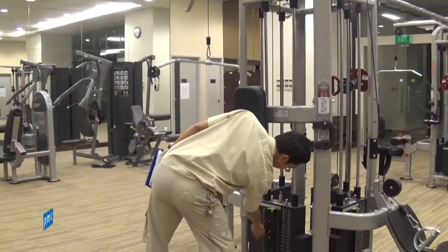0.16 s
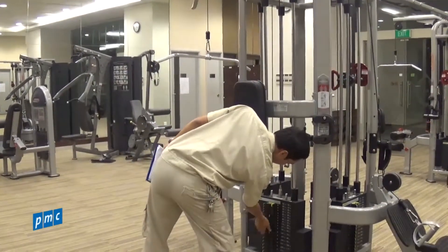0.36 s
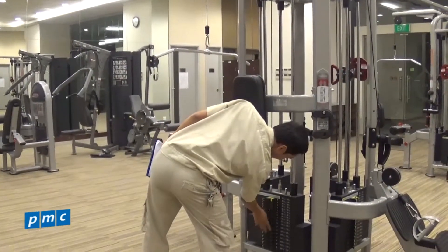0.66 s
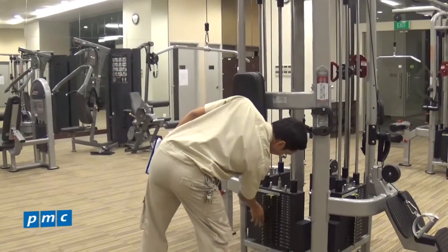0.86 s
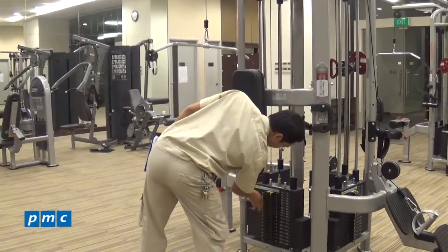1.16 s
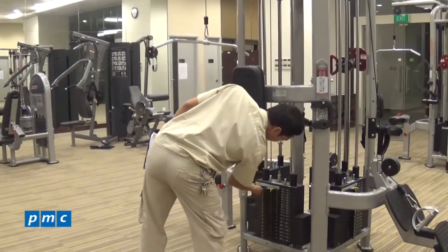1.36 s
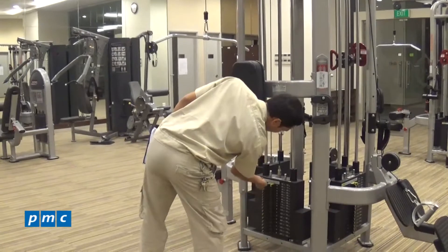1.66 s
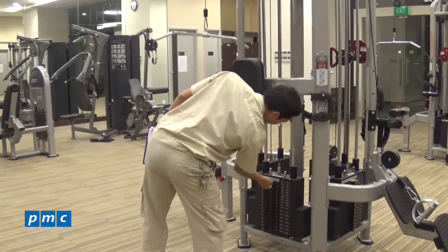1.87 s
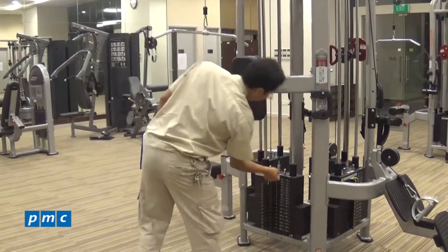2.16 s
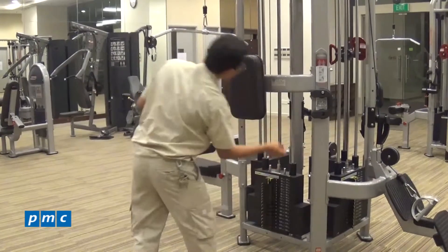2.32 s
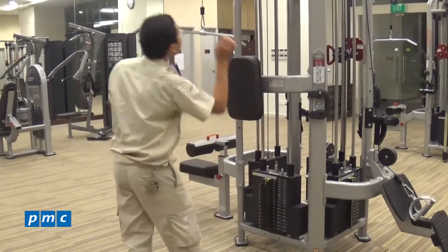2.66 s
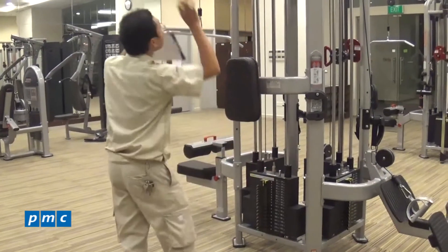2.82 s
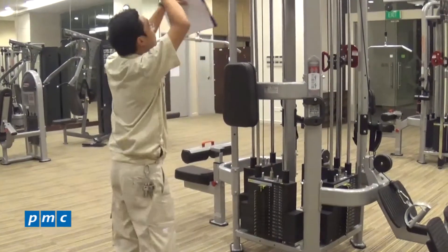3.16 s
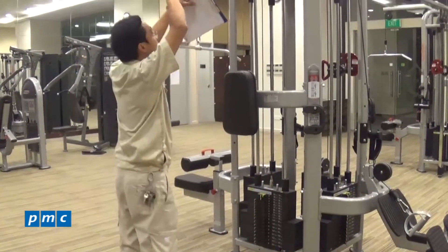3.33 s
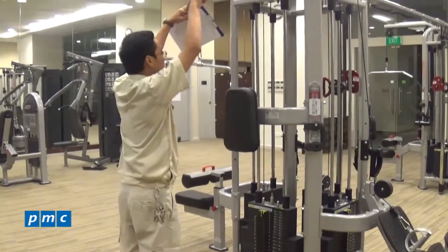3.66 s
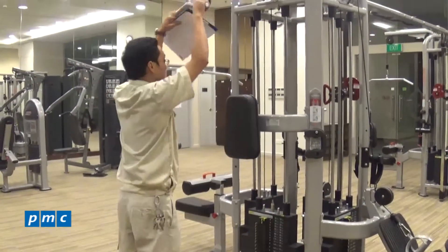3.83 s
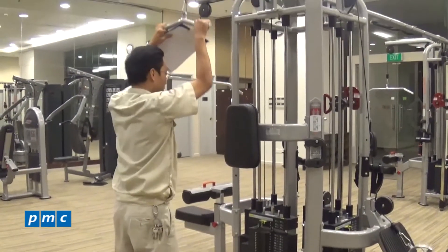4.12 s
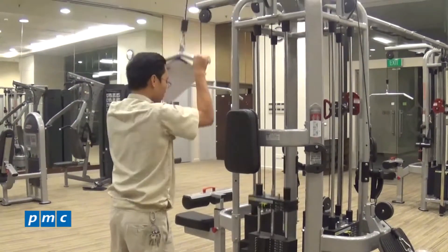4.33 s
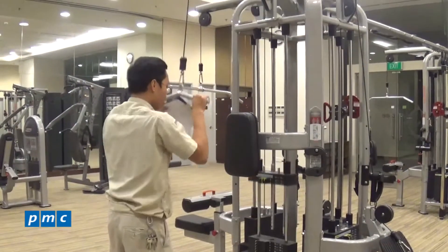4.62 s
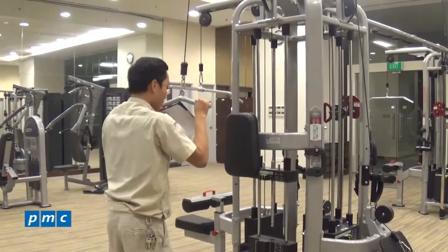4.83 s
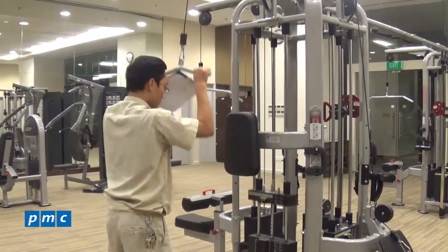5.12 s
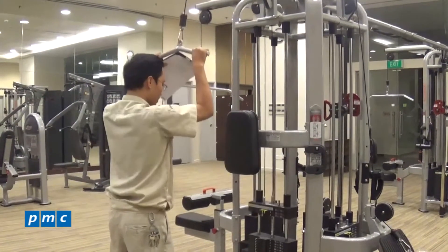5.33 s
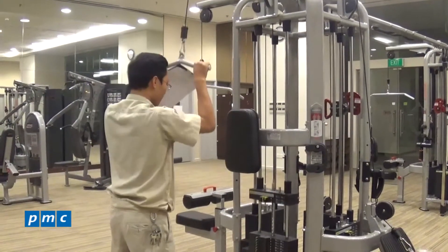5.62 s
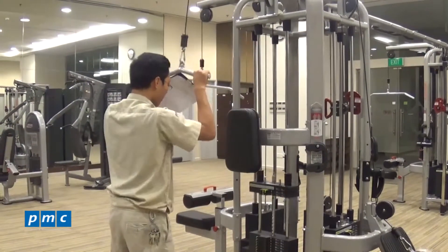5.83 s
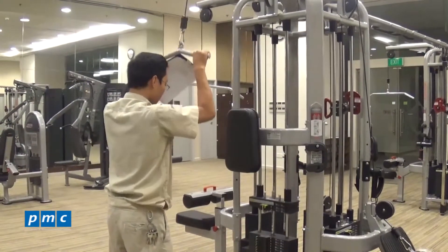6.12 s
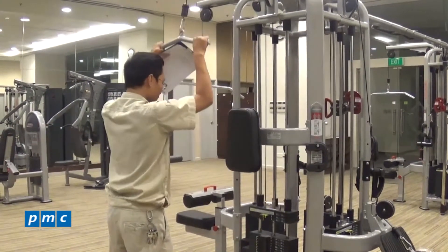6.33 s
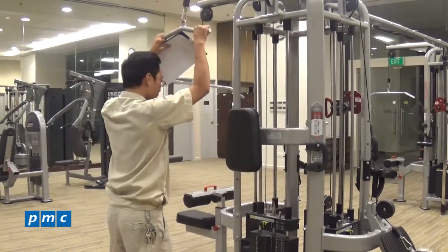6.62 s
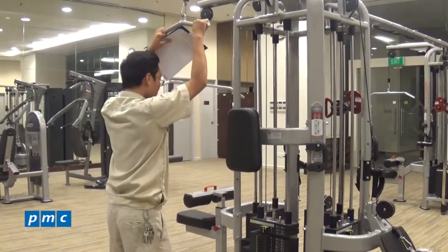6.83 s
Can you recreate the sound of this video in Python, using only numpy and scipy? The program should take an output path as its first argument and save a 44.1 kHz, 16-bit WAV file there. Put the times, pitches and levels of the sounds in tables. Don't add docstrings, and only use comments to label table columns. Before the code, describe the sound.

Five hard metallic clanks from stacked weight plates ring in a bright gym hall, then small camera clicks, a short steel-bar jingle and soft ventilation hiss.

```python
import sys
import numpy as np
from scipy import signal
from scipy.fft import rfft, irfft
from scipy.io import wavfile
from scipy.ndimage import uniform_filter1d

SR = 44100
rng = np.random.default_rng(int(sys.argv[2]) if len(sys.argv) > 2 else 0)


def natural_amplitude(level_db):
    exponent = np.asarray(level_db, float) / 20
    return 10 ** exponent


def master(y):
    cut = np.clip(np.atleast_2d(y).T, -1, 1)
    pcm = np.round(cut * 32767)
    wavfile.write(sys.argv[1], SR, pcm.astype(np.int16))


N = 307785
T = np.arange(N) / SR

# (time [s], ring level [dB], ring frequency [Hz], edge re ring [dB])
PIN_BLOWS = [(.039, -27.5, 2170, -19), (.0511, -30, 2110, -21), (.0746, -32, 2020, -14),
             (.1207, -27, 4030, -2), (.1281, -27.5, 2150, -9), (.1379, -12, 2120, -7), (.15, -16, 2280, -9),
             (.1686, -18.5, 2300, -5), (.5169, -26, 1960, -7), (.5258, -13, 2090, -4),
             (.5377, -19, 2110, -6), (.5467, -14.5, 2090, -5), (.5573, -18, 2110, -8),
             (.798, -29.5, 2170, -4), (.8259, -26, 2300, -6), (.844, -14, 2170, -2), (.8544, -15, 2500, -8),
             (1.167, -34, 1960, 2), (1.1793, -13, 2450, -3.5), (1.2085, -13.5, 1900, -5),
             (1.226, -19, 1680, -2), (1.2359, -18, 1590, -13), (1.5962, -37, 2110, -6),
             (1.6088, -37, 1890, 3), (1.6999, -38, 3620, -2), (1.7416, -32, 4480, 3.5),
             (1.7562, -24, 4330, 13), (1.765, -19, 2000, 3), (1.7737, -17, 1530, -.4),
             (1.7854, -21.5, 4200, 3)]
# (time [s], ring level [dB], ring frequency [Hz], edge re ring [dB])
HOOK_BLOWS = [
    (3.8345, -50, 1450, -25),
    (3.8655, -44, 1400, 4),
    (3.8719, -43, 1500, -3),
    (3.8775, -28, 2390, 11.5),
    (3.882, -27, 4010, .3),
    (3.8925, -27, 4010, 6),
    (3.8995, -25, 1830, 0),
]
# (start [s], hardest blow [s])
CLANK_TIMES = [
    (0, .039),
    (.11, .1375),
    (.5, .5255),
    (.82, .8435),
    (1.16, 1.179),
    (1.73, 1.756),
    (3.82, 3.877),
]
# (tail in the hall [dB], gain lost to the limiter [dB])
CLANK_LEVELS = [
    (-41, 3.5),
    (-17.5, 7),
    (-23, 5),
    (-19, 5.5),
    (-25, -0.5),
    (-19, 5.5),
    (-32, 2.5),
]
# (frequency [Hz], density [dB per Hz])
CLANK_COLOURS = [
    [(300, -35.5), (1260, -13), (1700, -20), (2060, -8.5), (3060, -17), (4390, -12), (5020, -21.5),
     (11000, -24)],
    [(300, -48.5), (1110, -17.5), (1620, -28.5), (1800, 5), (2290, 3.5), (2600, -7.5), (9320, -14),
     (11000, -15)],
    [(200, -41), (880, -18.5), (1710, -11.5), (2270, -2), (2690, -11.5), (3640, -11.5), (6880, -11.5),
     (11000, -17)],
    [(300, -43), (1000, -14.5), (1270, -20.5), (1620, -18.5), (2290, 0), (3100, 1), (3550, -3.5),
     (11000, -11.5)],
    [(250, -28.5), (800, -15.5), (1710, -2), (3830, -9), (4760, -16.5), (5820, -8), (6880, -17.5),
     (10000, -13.5)],
    [(300, -33.5), (585, -23), (804, -12.5), (1500, -5.5), (2200, -3.5), (4840, -7.5), (9300, -1),
     (11000, -11)],
    [(200, -7.5), (450, -12.5), (1200, -2), (1890, -4.5), (2350, -7), (4760, -14.5), (6330, -2.5),
     (11000, -10.5)],
]
# (frequency [Hz], width [Hz], level [dB])
PLATE_MODES = [
    [(2070, 150, 0), (4430, 270, -14)],
    [(1980, 450, 0), (3140, 54, -6), (4460, 180, -12), (4880, 47, -11), (5620, 56, -14), (9040, 70, -17)],
    [(2310, 180, 0), (3200, 130, -5), (4180, 63, -8), (6690, 56, -11), (8430, 340, -15), (9040, 250, -15)],
    [(2280, 110, -4), (2650, 190, -3), (3170, 72, 0), (3960, 53, -10), (5360, 45, -9), (6380, 37, -12)],
    [(1710, 160, 0), (2290, 65, -1), (2770, 100, -4), (3270, 72, -5), (5650, 53, -10), (8860, 41, -16)],
    [(1480, 38, 0), (2150, 130, -2), (3090, 200, -3), (6210, 91, -7)],
    [(684, 54, 0)],
]
PLATE_MODES_DB = [-10, -9, -10, -7, -11, -13, -21]
BAR_MODES_HZ = [680, 1180, 1313, 1824, 1911, 2637, 2976, 3784, 4198, 6481, 7445, 8510, 9743, 9824]
BAR_MODES_DB = [-21, -14, -10, -13, -10, -19, -7, -8.5, -9, 2, -12, -14, -16, -10]
# (time [s], time until a hand damps it [s])
BAR_BLOWS = [
    (3.879, .035),
    (3.893, .02),
]
BAR_BLOWS_DB = [-19.5, -19.5]
# (frequency [Hz], T60 [s])
HALL_DECAY = [(200, 2.7), (800, 1.68), (2000, 1.223), (4000, 1.17), (7000, 0.77), (11000, 0.69)]
# (frequency [Hz], side minus mid [dB])
HALL_WIDTH = [(200, -15.5), (1000, -7.5), (4000, -7), (11000, -8)]
# (time [s], low ring [dB], low ring [Hz], high ring [dB], high ring [Hz])
BODY_CLICKS = [
    (2.5196, -55, 1120, -57, 7690),
    (2.7779, -35, 3750, -34, 5560),
    (3.0256, -37.5, 3700, -53, 9000),
    (3.2033, -32, 2820, -28, 9800),
    (3.4249, -62, 1060, -52, 10000),
    (6.3022, -54.5, 2900, -54, 4970),
    (6.5623, -51, 2520, -57, 6740),
]
# (time [s], level [dB], frequency [Hz], length [s])
BODY_KNOCKS = [
    (2.775, -45, 930, 0.0067),
    (3.204, -43.5, 1070, 0.009),
    (5.763, -53, 960, .006),
    (5.766, -51, 460, 0.0093),
]
# (start [s], level [dB], treble re low [dB], rise [s], hold [s])
CLOTH_RUB = [
    (2.702, -48.5, -1.5, .05, .065),
    (2.779, -49, 6, .002, .002),
]
# (time [s], level [dB], rise [s])
PULLEY_WHISPER = [
    (4.45, -59, .15),
    (5.06, -57, .4),
    (6.31, -69, .6),
]
# (time [s], level [dB])
FLOOR_LURCHES = [
    (3.894, -56),
    (4.01, -47.5),
    (4.252, -58),
    (4.42, -65),
]
# (frequency [Hz], density [dB per Hz])
HISS_COLOUR = [(12, -46), (20, -19), (48, -13), (75, -8), (103, -9), (153, -6), (194, -9), (463, -10),
               (850, -11), (1110, -14), (2200, -16), (2510, -16.5), (3350, -18.5), (10200, -22.5),
               (11000, -26), (14300, -65), (22000, -120)]
# (frequency [Hz], side minus mid [dB])
HISS_WIDTH = [(60, -18.5), (110, -17), (190, -5), (340, -3), (610, -1), (1100, 0), (1960, -0.5), (3510, -4),
              (6270, -6), (11200, -9.5)]
# (time [s], level [dB])
ROOM_TONE_LEVEL = [(0, -52), (2.6, -52), (3.6, -55.5), (5, -57), (7, -59)]
# (frequency [Hz], rms level [dB])
MAINS_HUM = [(100, -61.5), (200, -73.5), (300, -80.5)]

EDGE_HZ, EDGE_HZ_PER_DB, EDGE_TOP_HZ = 8530, 191.5, 9300
CONTACT_S, CONTACT_DB_PER_HALVING = .0034, 30
REBOUND_S, REBOUND_DB = .007, -13
CLANK_SPAN_S = .105
SKIRT_LOW_DB, SKIRT_HIGH_HZ, SKIRT_HIGH_DB = -19.5, 15440, -31.5
STACK_PAN_DB = -.5
BAR_LEFT_DB, BAR_T60_S, BAR_BEAT_DB = -35.5, 1.1, 3
BAR_WET_DB = -46
EARLIER_S, EARLIER_DB = .32, -28.5
CLICK_S = .0022
RUB_FADE_DB_S, RUB_TREBLE_FADE_DB_S = 300, 650
TICK_S, TICK_PERIOD_S, TICK_LENGTH_S = .0715, .04, .003
TICK_HZ, TICK_DB, TICK_WEAK_DB = 2650, -59.5, -8
THUD_RISE_S, THUD_FADE_DB_S, THUD_DEEP_DB, THUD_DEEP_S = .069, 99, -84.5, .56
PULLEY_FADE_DB_S = 32
LIMIT_DB, RELEASE_S, TOP_HZ = 0, .048, 11000


def stack():
    direct, sent = np.zeros(N), np.zeros(N)
    blows = PIN_BLOWS + HOOK_BLOWS
    for (s, db, hz, edge), late in zip(blows, rng.random(len(blows))):
        edge_db = db + edge
        edge_hz = min(EDGE_HZ + EDGE_HZ_PER_DB * edge, EDGE_TOP_HZ)
        length = CONTACT_S * 2 ** (-(max(db, edge_db) + 19) / CONTACT_DB_PER_HALVING)
        add(direct, s, clack(db, hz, edge_db, edge_hz, length, wide=.35))
        rebound = clack(db + REBOUND_DB, hz, edge_db + REBOUND_DB, edge_hz, 2 * length, wide=.35)
        add(direct, s + REBOUND_S * (.5 + late), rebound)
    clanks = zip(CLANK_TIMES, CLANK_LEVELS, CLANK_COLOURS, PLATE_MODES, PLATE_MODES_DB)
    for (start, _), (tail_db, _), spectrum, modes, modes_db in clanks:
        push = np.zeros(SR // 2)
        for s, ring_db, _, edge in blows:
            if start <= s < start + CLANK_SPAN_S:
                push[int((s - start) * SR)] = natural_amplitude(ring_db) * np.hypot(1, natural_amplitude(edge))
        add(sent, start, plates(push, spectrum, modes, modes_db) * natural_amplitude(tail_db))
    return direct, sent


def plates(push, spectrum, modes, modes_db):
    (low_hz, low_db), (_, high_db) = spectrum[0], spectrum[-1]
    below = (.6 * low_hz, low_db + SKIRT_LOW_DB)
    above = (SKIRT_HIGH_HZ, high_db + SKIRT_HIGH_DB)
    crash = colour(push, [below, *spectrum, above, (SR / 2, -120)])
    rings = sum(natural_amplitude(db) * band(push, hz, width + 50) / np.sqrt(width + 50) for hz, width, db in modes)
    return (unit(crash) + natural_amplitude(modes_db) * unit(rings)) / np.sqrt(len(push))


def clack(low_db, low_hz, high_db, high_hz, length, wide=.2, broad=.4):
    t = T[:1024]
    contact = np.exp(-(t / (1.1 * length)) ** 2) + .3 * np.exp(-t / (2 * length))
    chatter = rng.standard_normal((4, len(t))) * contact * np.minimum(t / .0003, 1)
    ring = patch(chatter[0], low_hz, wide * low_hz, .6 * low_hz)
    crack = patch(chatter[1], 3300, 2600, 2600)
    edge = patch(chatter[2], high_hz, 1500, 4000)
    sizzle = patch(chatter[3], 8000, 6000, 6000)
    return energy(ring + broad * crack, low_db) + energy(edge + .6 * sizzle, high_db)


def bar():
    held_ring, left_ring = np.zeros(N), np.zeros(N)
    t, start = T[:SR], BAR_BLOWS[0][0]
    phases = rng.random(len(BAR_MODES_HZ))
    modes = [natural_amplitude(db) * np.sin(2 * np.pi * (hz * t + phase))
             for hz, db, phase in zip(BAR_MODES_HZ, BAR_MODES_DB, phases)]
    swing = 0
    for (s, held), db in zip(BAR_BLOWS, BAR_BLOWS_DB):
        since = np.maximum(t - s + start, 0)
        blow = natural_amplitude(db) * np.exp(-(since / held) ** 2.5) * np.minimum(since / .002, 1)
        swing = np.hypot(swing, blow)
    add(held_ring, start, swing * sum(modes))
    swaying = 0
    for mode, hz in zip(modes, BAR_MODES_HZ):
        fade_db = 60 * t / BAR_T60_S * max(hz / 3000, 1) ** .45
        swaying = swaying + mode * natural_amplitude(BAR_BEAT_DB * walk(40, size=len(t)) - fade_db)
    add(left_ring, start, natural_amplitude(BAR_BLOWS_DB[-1] + BAR_LEFT_DB) * swaying * np.minimum(t / .03, 1))
    return held_ring, left_ring


def hall():
    t, out = T[:2 * SR], 0
    for hz in 125 * 2 ** np.arange(0, 6.8, 1 / 3):
        noise = rng.standard_normal((2, len(t)))
        mid, side = band(band(noise, hz, hz / 3), hz, hz / 3)
        side = side * natural_amplitude(by_hz(HALL_WIDTH, hz))
        decay = np.exp(-np.log(1000) * t / by_hz(HALL_DECAY, hz))
        out = out + np.array([mid + side, mid - side]) * decay
    lumps = natural_amplitude(3.8 * walk(250, size=len(t)) * np.exp(-t / .11))
    onset = np.clip((t - .003) / .01346, 0, 1)
    return out * lumps * onset / np.sqrt(np.mean(out[:, :SR // 10] ** 2))


def camera():
    out = np.zeros((2, N))
    for s, *click in BODY_CLICKS:
        add(out, s, clack(*click, CLICK_S, wide=.3, broad=.9))
    for s, db, hz, length in BODY_KNOCKS:
        add(out, s, band(clack(db, hz, db - 30, 6400, length), hz, hz))
    grain = rng.standard_normal((2, N)) * natural_amplitude(2.5 * walk(200))
    low, treble = patch(grain[0], 1950, 800, 1400), patch(grain[1], 9000, 4500, 5500)
    for s, db, treble_db, rise, hold in CLOTH_RUB:
        out += low * swell(s, db, rise, hold, RUB_FADE_DB_S)
        out += treble * swell(s, db + treble_db, rise, hold, RUB_TREBLE_FADE_DB_S)
    for k, s in enumerate(np.arange(TICK_S, N / SR, TICK_PERIOD_S)):
        db = TICK_DB + TICK_WEAK_DB * (k % 2) + .8 * rng.standard_normal()
        tick = clack(db, TICK_HZ, db - 30, 6000, TICK_LENGTH_S, wide=.3, broad=.2)
        add(out, s, tick * np.array([[1.3], [.7]]))
    return out


def pulleys():
    grain = rng.standard_normal((2, N)) * natural_amplitude(3.5 * walk(30))
    pulls = sum(swell(s, db - 3.5, rise, 0, PULLEY_FADE_DB_S) for s, db, rise in PULLEY_WHISPER)
    return patch(grain, 1000, 1400, 1400) * pulls


def floor():
    deep, low = rng.standard_normal((2, N))
    rumble = swell(FLOOR_LURCHES[0][0], THUD_DEEP_DB, THUD_RISE_S, THUD_DEEP_S, THUD_FADE_DB_S)
    lurches = sum(swell(s, db, THUD_RISE_S, 0, THUD_FADE_DB_S) for s, db in FLOOR_LURCHES)
    return patch(deep, 25, 25, 25) * rumble + unit(band(low, 55.3, 25)) * lurches


def room_tone():
    mid, side = (colour(noise, HISS_COLOUR) for noise in rng.standard_normal((2, N)))
    side = colour(side, HISS_WIDTH) / np.std(mid)
    air = (unit(mid) + side * np.array([[1], [-1]])) * natural_amplitude(.73 * walk(4.6))
    hum = 0
    for hz, db in MAINS_HUM:
        level = np.sqrt(2) * natural_amplitude(db + .5 * walk(8.9))
        hum = hum + level * np.sin(2 * np.pi * hz * T + .3 * walk(5.4))
    stirring = patch(rng.standard_normal((2, N)), 22, 20, 20) * natural_amplitude(-74)
    return (air + hum * natural_amplitude(56.5)) * natural_amplitude(along(ROOM_TONE_LEVEL, column=1)) + stirring


def ducking():
    lost_db = 0
    for (_, s), (_, db) in zip(CLANK_TIMES, CLANK_LEVELS):
        since = np.maximum(T - s, 0)
        lost_db = lost_db + db * (T > s) * np.exp(-(since / RELEASE_S) ** 1.8)
    return natural_amplitude(-uniform_filter1d(lost_db, size=133))


def along(table, column):
    rows = np.array(table, float)
    return np.interp(T, rows[:, 0], rows[:, column], left=-120, right=-120)


def by_hz(table, hz):
    rows = np.array(table, float)
    return np.interp(np.log(np.maximum(hz, 1)), np.log(rows[:, 0]), rows[:, 1])


def colour(x, table):
    size = 2048
    cep = irfft(by_hz(table, np.arange(size // 2 + 1) * SR / size) * np.log(10) / 20)
    cep[1:size // 2] *= 2
    cep[size // 2 + 1:] = 0
    return signal.fftconvolve(x, irfft(np.exp(rfft(cep))))[:len(x)]


def unit(x):
    return x / np.sqrt(np.mean(x ** 2))


def energy(x, db):
    return x * natural_amplitude(db) * np.sqrt(SR / 200 / np.sum(x ** 2))


def band(x, hz, width):
    return signal.lfilter(*signal.iirpeak(hz, hz / max(width, 1), SR), x)


def patch(x, hz, width, outer_width):
    return unit(band(band(x, hz, width), hz, outer_width))


def walk(rate, size=N):
    k = int(SR / rate)
    steps = np.repeat(rng.standard_normal(size // k + 1), k)
    return 1.2 * uniform_filter1d(steps, k)[:size]


def swell(s, db, rise, hold, fade_db_s):
    climb_db = 25 * np.maximum(s - T, 0) / max(rise, 1e-3)
    return natural_amplitude(db - climb_db - fade_db_s * np.maximum(T - s - hold, 0))


def add(out, s, x):
    i = int(s * SR)
    x = x[..., :N - i]
    out[..., i:i + x.shape[-1]] += x


def scene():
    direct, sent = stack()
    held_ring, left_ring = bar()
    room = hall()
    wet = signal.fftconvolve((sent + held_ring * natural_amplitude(BAR_WET_DB))[None], room, axes=1)[:, :N]
    impulse = signal.unit_impulse(SR // 2)
    earlier = plates(impulse, CLANK_COLOURS[0], PLATE_MODES[0], PLATE_MODES_DB[0]) * natural_amplitude(EARLIER_DB)
    add(wet, 0, signal.fftconvolve(earlier[None], room, axes=1)[:, int(EARLIER_S * SR):])
    blows = direct / ducking() * natural_amplitude(STACK_PAN_DB * np.array([[.5], [-.5]]))
    return blows + held_ring + left_ring + wet + camera() + pulleys() + floor() + room_tone()


def low_pass(x):
    return signal.sosfilt(signal.butter(12, 11820, fs=SR, output="sos"), x)


def record(dry):
    top_cut = signal.ellip(8, .3, 55, TOP_HZ, fs=SR, output="sos")
    cut = signal.sosfilt(top_cut, dry * ducking())
    mix = np.clip(cut, -natural_amplitude(LIMIT_DB), natural_amplitude(LIMIT_DB))
    return low_pass(mix)


dry = scene()
out = record(dry)
master(out)
```